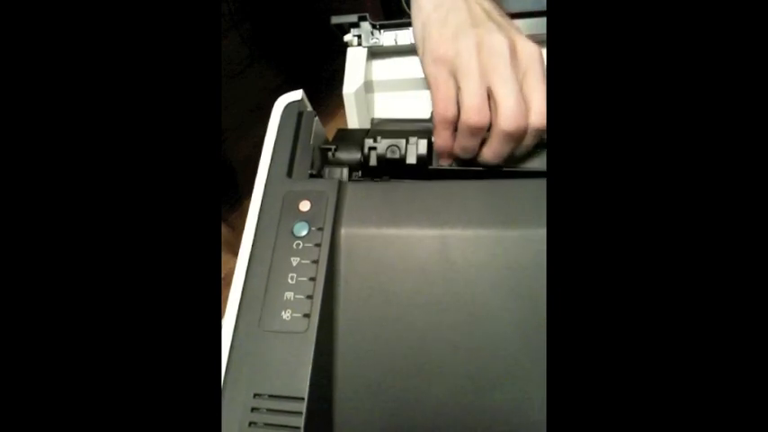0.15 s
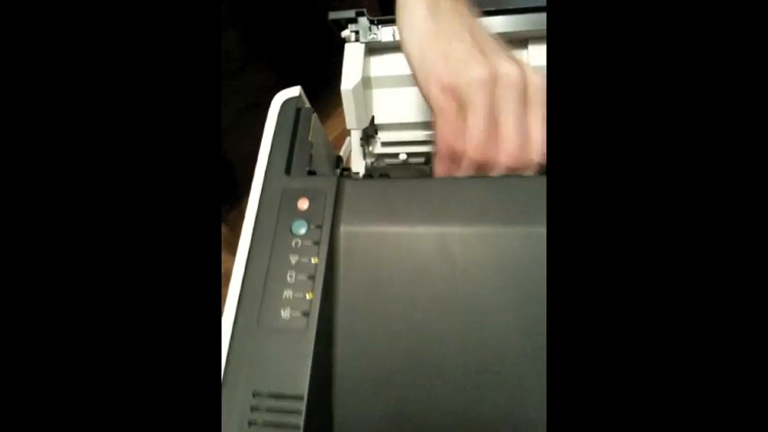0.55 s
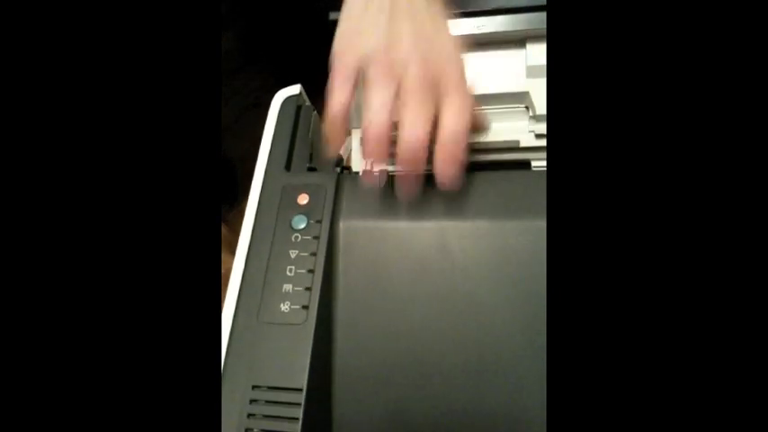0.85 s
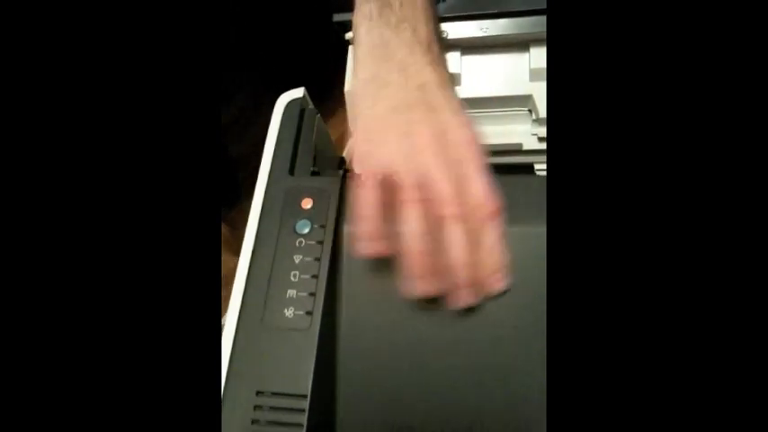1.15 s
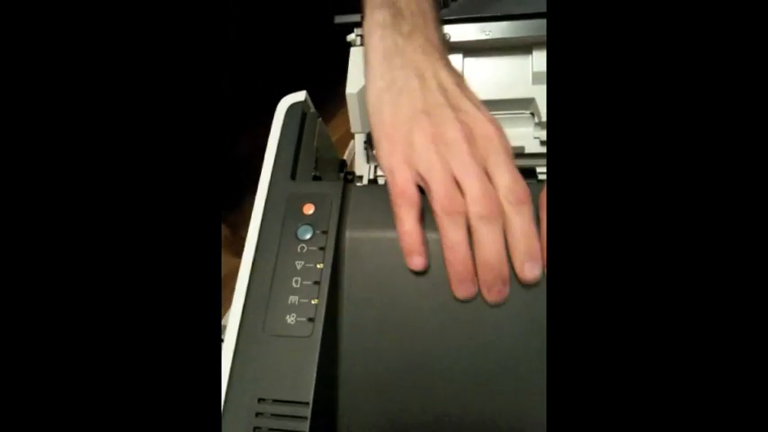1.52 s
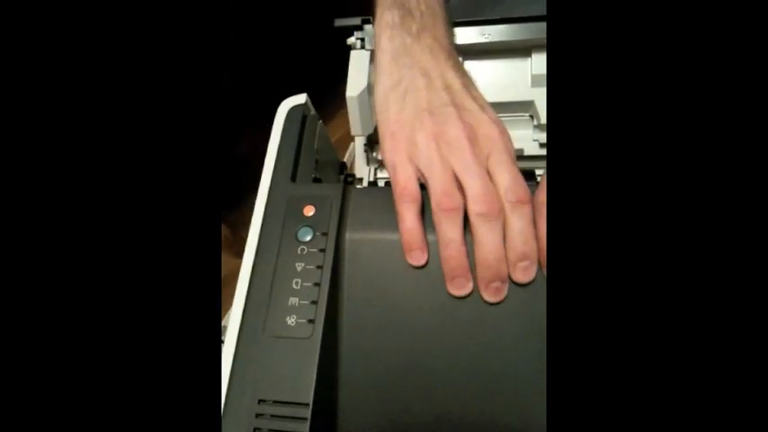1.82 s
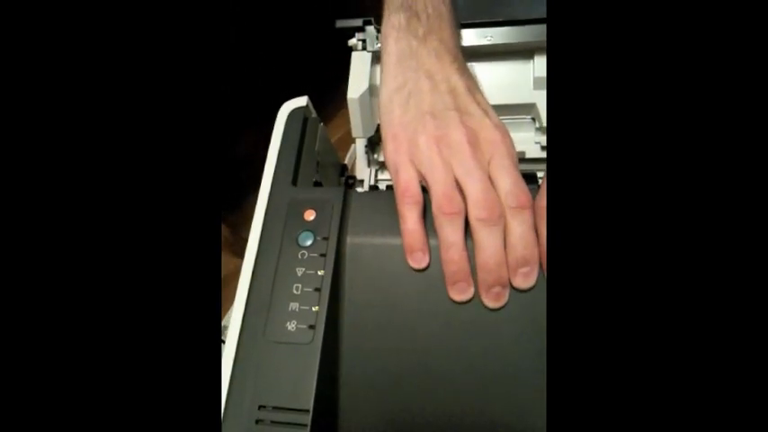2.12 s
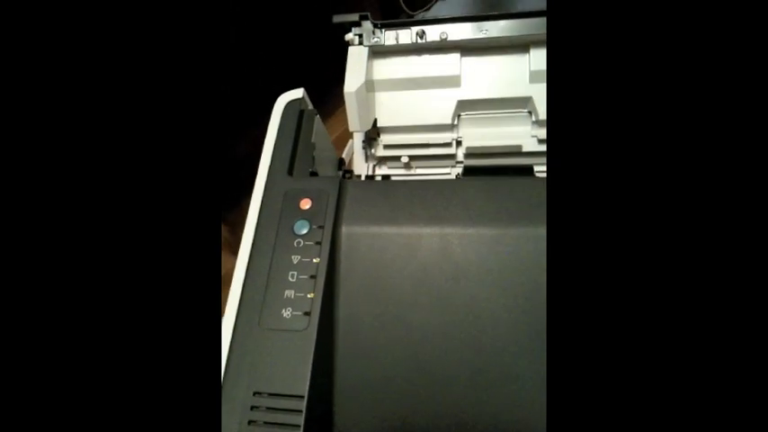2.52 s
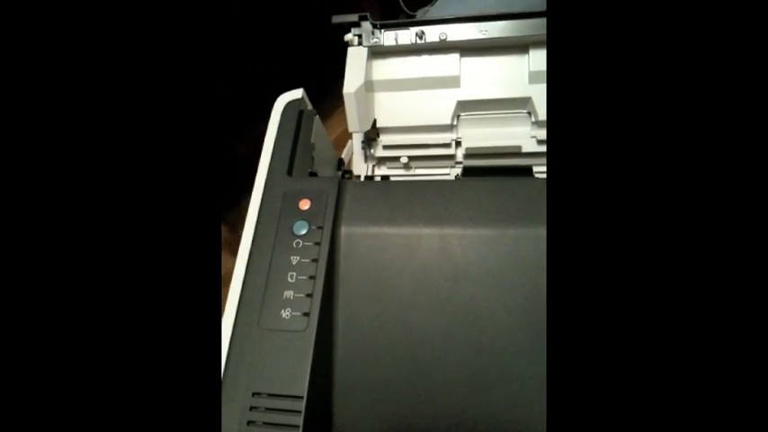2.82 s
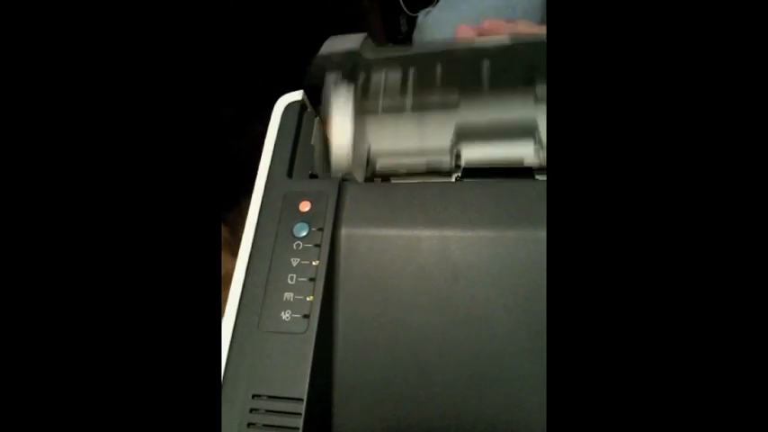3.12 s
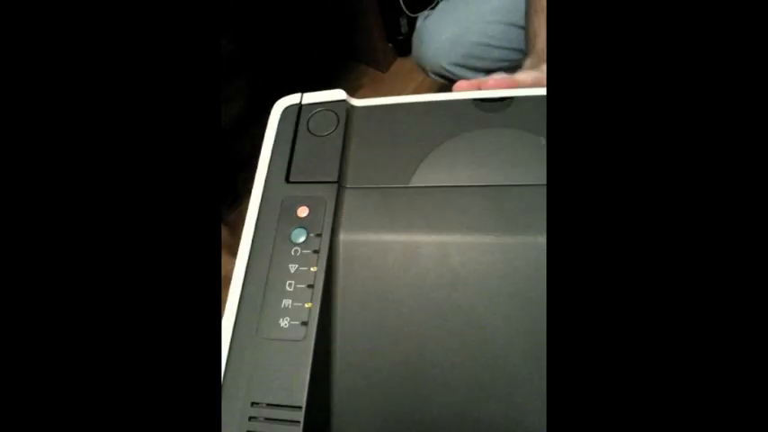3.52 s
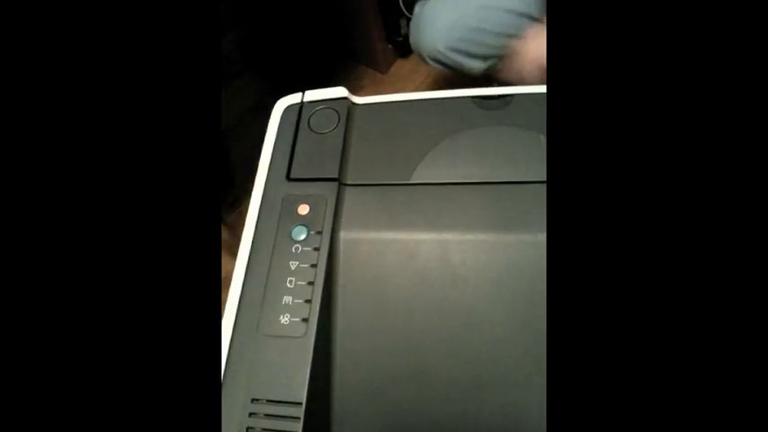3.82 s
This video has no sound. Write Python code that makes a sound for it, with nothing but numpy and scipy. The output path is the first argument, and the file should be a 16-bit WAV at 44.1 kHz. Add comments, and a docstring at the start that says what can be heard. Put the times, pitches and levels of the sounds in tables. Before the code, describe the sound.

Plastic printer cartridge clicks and knocks into its seat, then the cover slams with a sharp clack

```python
"""In a small room, close to a phone, a laser printer's fan hums and whines: shaped noise under wavering sines.
A toner cartridge is slid and pushed in: bursts of uneven clicks ring its plastic modes, and hollow ones until seated.
Low decaying thuds mark its seating and a hand shifting on the lid, then the cover is swung shut with a sharp clack:
clicks, scrapes and a boom on the cover's own modes, and last a hand brushing it.
All but the fan is spread by the room's reflections."""
import sys
import numpy as np
from scipy import signal
from scipy.fft import rfft, irfft
from scipy.io import wavfile
from scipy.ndimage import uniform_filter1d, minimum_filter1d

SR = 44100
rng = np.random.default_rng(int(sys.argv[2]) if len(sys.argv) > 2 else 0)


def inscribe(sig):
    """Save sig as 16-bit PCM at rate SR to the path in sys.argv[1].

    A 1-D sig is mono; a 2-D sig holds one channel per row.
    Samples are clipped to [-1, 1] before scaling.
    """
    pcm = np.round(np.clip(np.atleast_2d(sig).T, -1, 1) * 32767)
    wavfile.write(sys.argv[1], SR, pcm.astype(np.int16))


N = 174195  # length in samples
BASS_HZ, TREBLE_HZ = 500, 4000  # band limits of the plastic parts


def amp(db):
    """Level law: amplitude ratio of a level in dB."""
    return 10 ** (np.asarray(db) / 20)


def unit(x):
    """Normalisation to an rms of 1."""
    return x / np.sqrt(np.mean(x ** 2))


def unit_energy(x):
    """Normalisation to an energy of 1."""
    return x / np.sqrt(np.sum(x ** 2))


def decay(age, t60):
    """Exponential damping: 60 dB down after t60 seconds."""
    return 1000. ** (-age / t60)


def ringing(modes, age):
    """Modal superposition: a sum of damped sines (f/Hz, level/dB, T60/s)."""
    return sum(amp(db) * np.sin(2 * np.pi * f * age) * decay(age, t60) for f, db, t60 in modes)


def butter(x, order, hz, kind):
    """Butterworth filtering: a maximally flat pass band."""
    return signal.sosfilt(signal.butter(order, hz, kind, fs=SR, output="sos"), x)


def on_log(points, hz):
    """Interpolation of a (f/Hz, value) table on a logarithmic frequency axis."""
    f, value = np.array(points).T
    return np.interp(np.log(np.maximum(hz, 1)), np.log(f), value)


def walk(rate):
    """Slow random modulation: random levels joined by ramps of 1 / rate seconds, rms 1."""
    k = int(SR / rate)
    steps = np.repeat(rng.standard_normal(N // k + 1), k)
    return unit(uniform_filter1d(steps, k)[:N])


# spectrum of the air rush: f/Hz, relative level per Hz/dB
AIR = [(12, -68), (20, -31), (60, -73), (98, -23.5), (210, -7), (337, -8.5), (410, -1.5), (513, -8),
       (2300, -13), (4180, -20), (13900, -31), (16000, -42)]
# fan resonances: f/Hz, full width at half amplitude/Hz, mean level/dB
HUM = [(127.4, 8.3, -77), (212, 39, -66.5), (425, 10, -79), (736, 15, -74.5)]
AIR_DB, WHINE_HZ, WHINE_DB, OVERTONE_DB = -62, 4129, -78.5, -86


def fan():
    """Broadband flow noise, narrow-band resonance and a tone with its octave, all wavering slightly."""
    hz = np.fft.rfftfreq(N, 1 / SR)
    rush = irfft(rfft(rng.standard_normal(N)) * amp(on_log(AIR, hz)), N)
    out = amp(AIR_DB + .8 * walk(2.2)) * unit(rush)
    for f, width, db in HUM:
        resonance = 1 / (1 + (2 * (hz - f) / width) ** 2)
        hum = irfft(rfft(rng.standard_normal(N)) * resonance, N)
        out = out + amp(db + 1.5 * walk(2.2)) * unit(hum)
    wavering_time = np.cumsum(1 + .0006 * walk(5)) / SR
    for f, db in ((WHINE_HZ, WHINE_DB), (2 * WHINE_HZ, OVERTONE_DB)):
        tone = np.sqrt(2) * np.sin(2 * np.pi * f * wavering_time)
        out = out + amp(db + 1.2 * walk(16)) * tone
    return out


# reverberation time of the room: f/Hz, T60/s
ROOM_T60 = [(100, 0.1), (300, .29), (2000, 0.28), (5000, 0.3), (14000, 0.15)]
ROOM_DB, ROOM_GAP_S = -8.5, 0.0017  # reverberant level, build-up time of the reflections


def room(x):
    """Diffuse reverberation: dense reflections, each octave band dying at its own rate."""
    t, tail = np.arange(SR) / SR, 0
    for hz in 62.5 * 2 ** np.arange(9):
        octave = [hz / np.sqrt(2), min(hz * np.sqrt(2), 20000)]
        noise = butter(rng.standard_normal(SR), 2, octave, "band")
        tail = tail + noise * decay(t, on_log(ROOM_T60, hz))
    tail = tail * (1 - np.exp(-(t / ROOM_GAP_S) ** 2))
    return x + amp(ROOM_DB) * signal.fftconvolve(x, unit_energy(tail))[:N]


# low thuds, the hand on the lid and at 1.466 s the cartridge thumping into its seat:
# t/s, level ahead of rise and decay/dB, f/Hz
THUDS = [(1.287, -51, 155), (1.891, -44.5, 194), (1.923, -47, 165), (2.171, -51, 185), (2.356, -47, 168),
         (2.45, -45.5, 175), (1.466, -33, 200)]
THUD_T60_S, THUD_RISE_S = 0.079, 0.0033


def thuds():
    """Damped oscillation: soft low thuds of the hand on the lid and of the cartridge seating."""
    t, out = np.arange(N) / SR, 0
    for s, db, hz in THUDS:
        age = np.maximum(t - s, 0)
        envelope = (1 - np.exp(-age / THUD_RISE_S)) * decay(age, THUD_T60_S)
        out = out + amp(db) * envelope * np.sin(2 * np.pi * hz * age)
    return out


def causal(db):
    """Minimum-phase principle: folding the cepstrum of dB gains on an rfft grid gives a causal response."""
    cepstrum = irfft(db * np.log(10) / 20)
    half = len(cepstrum) // 2
    cepstrum[1:half] *= 2
    cepstrum[half + 1:] = 0
    return irfft(np.exp(rfft(cepstrum)))


def body(colour, modes, ring_db):
    """Modal response: a broad crack plus modes, split into middle, bass and treble of energy 1 each."""
    t, hz = np.arange(8192) / SR, np.fft.rfftfreq(8192, 1 / SR)
    crack = unit(causal(on_log(colour, hz)))
    response = crack + amp(ring_db) * unit(ringing(modes, t))
    low = butter(response, 2, BASS_HZ, "low")
    high = butter(response, 2, TREBLE_HZ, "high")
    mid = butter(response, 2, [BASS_HZ, TREBLE_HZ], "band")
    return [unit_energy(band) for band in (mid, low, high)]


KNOCK_DB = -1.2  # added to every knock level
ATTACK_S = 0.002
SOFT_S_PER_DB, HARD_DB = .00015, -28  # knocks under HARD_DB start slower
SLIDE_DB, SLIP_DB = -4, 2.5  # added to every slide level, rms of its random variation


def shape(length, db):
    """Contact stiffness: a knock's chatter swells more slowly when weak, then decays exponentially."""
    age = np.arange(4096) / SR
    attack = ATTACK_S + SOFT_S_PER_DB * max(HARD_DB - db, 0)
    return (1 - np.exp(-age / attack)) * np.exp(-age / max(length, .001) * 2)


def contact(knocks, slides):
    """Addition of powers in three bands: knocks chatter and die, slides stick and slip."""
    power = np.zeros((3, N + 4096))
    for s, db, bass_db, treble_db, length, _ in knocks:
        i = max(int(s * SR), 0)
        band_gains = amp([0, bass_db, treble_db]) * amp(db + KNOCK_DB)
        power[:, i:i + 4096] += np.outer(band_gains, shape(length, db)) ** 2
    slip = amp(SLIDE_DB + SLIP_DB * walk(120))
    for rows in slides:
        s, db, bass_db, treble_db = np.array(rows).T
        i = np.arange(max(int(s[0] * SR), 0), min(int(s[-1] * SR), N))
        edge = np.minimum(np.minimum(i - i[0], i[-1] - i) / (.001 * SR), 1)  # 1 ms fades
        for band, offset_db in enumerate((0, bass_db, treble_db)):
            level = amp(np.interp(i / SR, s, db + offset_db))
            power[band, i] += (level * slip[i] * edge) ** 2
    return np.sqrt(power[:, :N])


SPOT_DB, SPOT_CYCLES = -7, 20  # level added to the wall's ring, cycles to -60 dB


def spots(knocks, grains):
    """Local resonance: each knock also rings the nearest wall at its own pitch."""
    out, t = np.zeros(N + 8192), np.arange(2048) / SR
    for s, db, _, _, length, hz in knocks:
        i = max(int(s * SR), 0)
        ring = np.sin(2 * np.pi * hz * t) * decay(t, SPOT_CYCLES / hz)
        push = shape(length, db) * grains[i:i + 4096]
        y = signal.fftconvolve(push, unit_energy(ring))
        out[i:i + len(y)] += amp(db + KNOCK_DB + SPOT_DB) * y
    return out[:N]


GRAIN_DB, BIGGEST_GRAIN_DB = 2.5, 9  # mean of the exponential size spread before its cap, the cap


def part(knocks, slides, colour, modes, ring_db):
    """Source-filter principle: dense clicks of uneven size, driven by the contact, ring the part."""
    size = amp(np.minimum(GRAIN_DB * rng.exponential(size=N), BIGGEST_GRAIN_DB))

    def grains():
        """Random excitation: clicks of uneven size, rms 1."""
        return unit(size * rng.standard_normal(N))

    out = spots(knocks, grains())
    for strength, response in zip(contact(knocks, slides), body(colour, modes, ring_db)):
        out = out + signal.fftconvolve(strength * grains(), response)[:N]
    return out


# modes of the cover: f/Hz, relative level/dB, T60/s
COVER = [(201, -3, .1), (240, 6, 0.1), (332, 9, 0.028), (775, -1, .035), (2000, -5, .01), (3550, -1, .012),
         (6300, 0, .004), (12550, -22.5, .08)]
# the cover's weight landing on front and rear rim: t/s, level ahead of the push and the high-pass/dB
SLAMS = [(3.2968, -4.5), (3.3225, -13)]
SLAM_PUSH_S = .0015


def slam():
    """Impulsive excitation: a short push sets the cover's low modes booming."""
    t, out = np.arange(N) / SR, 0
    low_modes = [mode for mode in COVER if mode[0] < BASS_HZ]
    for s, db in SLAMS:
        age = np.maximum(t - s, 0)
        ring = ringing(low_modes, age)
        out = out + amp(db) * (1 - np.exp(-age / SLAM_PUSH_S)) * ring / np.max(np.abs(ring))
    return out


# knocks of the cover, from 3.69 s under a brushing hand: t/s, level before KNOCK_DB/dB,
# bass re middle/dB, treble re middle/dB, chatter length (decay to 1/e^2)/s, struck wall f/Hz
CLACKS = [(2.954, -50.5, -15, -1, 0.01, 1690), (2.995, -36.5, -23, -11, 0.009, 1820),
          (3.067, -41, -21, -4, 0.011, 956), (3.176, -50, -12, -6, 0.015, 756),
          (3.265, -27, -14, -2.5, 0.008, 1766), (3.29, -9, -22, 3, 0.014, 1690),
          (3.297, -5, -8, -4, 0.012, 400), (3.302, 0, -18, 1, 0.011, 2050),
          (3.312, -10, -15, 1, 0.014, 1100), (3.324, -11, -12, -8, 0.0078, 762),
          (3.703, -42.5, -18, -12, 0.011, 1705), (3.719, -27.5, -15.5, -13, 0.01, 974),
          (3.734, -35.5, -20, -4, 0.0066, 1910)]
# cover rubbing on hinge and rim, from 3.69 s a hand brushing the cover, one list per stroke:
# t/s, level before SLIDE_DB/dB, bass re middle/dB, treble re middle/dB
RUBS = [
    [(2.99, -48, -15, -10), (3.062, -65, -8, -24), (3.072, -53, -19, 1.5), (3.13, -65, -8, -11)],
    [(3.25, -50.5, -3, -12), (3.266, -41.5, -15, 0), (3.283, -36, -1, -1)],
    [(3.288, -12, -10, 0), (3.293, -21, -13, 1)],
    [(3.5, -53, -12.5, -9.5), (3.596, -60.5, -9, 2), (3.604, -59, 0.5, -4.5), (3.66, -62, 7, -4.5)],
    [(3.695, -58.5, -6.5, -3), (3.713, -38, -5, -4), (3.737, -44, -4, 4), (3.8, -65.5, -22.5, -25)],
    [(3.81, -58, -19.5, -11), (3.886, -69.5, -2, -18), (3.924, -67, -13.5, -17.5), (3.95, -64.5, -7, -11.5)],
]
# crack spectrum of the cover: f/Hz, relative level per Hz/dB
COVER_COLOUR = [(30, -49.5), (120, -25.5), (230, -3.5), (600, -4.5), (1900, -0.5), (4500, -8.5),
                (6500, -7.5), (8500, -13), (12000, -16.5), (16000, -24)]
COVER_RING_DB, COVER_LOW_HZ = -8, 170  # modes re crack, high-pass corner


def cover():
    """Radiation cut-off: the thin cover radiates little below its lowest mode."""
    struck = part(CLACKS, RUBS, COVER_COLOUR, COVER, COVER_RING_DB) + slam()
    return butter(struck, 4, COVER_LOW_HZ, "high")


# knocks of the cartridge and housing: t/s, level before KNOCK_DB/dB, bass re middle/dB, treble re middle/dB,
# chatter length (decay to 1/e^2)/s, struck wall f/Hz
KNOCKS = [(0.001, -37.5, -7, -6, 0.024, 1330), (0.061, -36, -14, -12.5, 0.01, 1990),
          (0.309, -49, -18, -3, 0.018, 1540), (0.432, -49, -22, -20, 0.0072, 1160),
          (0.443, -36, -23, -19, 0.0073, 1290), (0.454, -34.5, -32, -0.5, 0.012, 1310),
          (0.4615, -19, -38, -9, 0.008, 1160), (0.472, -23, -23, -8, 0.0086, 1340),
          (0.496, -18.5, -30, 1, 0.008, 2400), (0.502, -19, -40, -5, 0.007, 1200),
          (0.512, -30, -26, -10, 0.0055, 1070), (0.539, -32, -19, 1, 0.0067, 1350),
          (0.548, -31, -27, -3, 0.012, 1120), (0.571, -30.5, -36, -3, 0.011, 1360),
          (0.58, -35.5, -22, 3.5, 0.024, 1820), (0.599, -32, -8, -9, 0.0095, 2260),
          (0.673, -32, -6, 1, 0.0039, 1270), (0.712, -26.5, -12, -16, 0.0076, 620),
          (0.722, -25.5, -18, 5, 0.0078, 1450), (0.745, -27, -23, -9, 0.008, 2240),
          (0.775, -31.5, -26, 3.5, 0.0057, 1740), (0.803, -30.5, -18, -1, 0.0076, 1410),
          (0.844, -39, -15, -7, 0.0073, 1320), (0.876, -31.5, -26, -22, 0.0074, 2540),
          (0.888, -28.5, -14, -1.5, 0.0072, 2560), (0.909, -24, -40, -8.5, 0.015, 850),
          (0.929, -33, -23, -4, 0.0068, 2380), (1.095, -34, -31, -9.5, 0.013, 1440),
          (1.268, -52, -18, -9, 0.012, 937), (1.4145, -37, -14, 0, 0.012, 1440),
          (1.446, -25, -27, -8, 0.013, 2190), (1.458, -16, -34, -1, 0.011, 1470),
          (1.462, -12, -43, 0, 0.012, 560), (1.484, -24, -19, -10, 0.012, 1660),
          (1.508, -26, -20, -8, 0.03, 1350), (1.631, -41, -27, -4.5, 0.014, 1780),
          (1.76, -45.5, -16, -9.5, 0.0098, 730), (1.933, -38.5, -25, -16, 0.015, 1270),
          (2.122, -39, -23, -12, 0.025, 1100), (2.191, -42.5, -17, -6, 0.02, 1370),
          (2.352, -51.5, -12, 2, 0.008, 503)]
# cartridge sliding in its guides, one list per stroke:
# t/s, level before SLIDE_DB/dB, bass re middle/dB, treble re middle/dB
SLIDES = [
    [(0.41, -64.5, -12, 5), (0.45, -45.5, -20, -16), (0.46, -40, -27, -4)],
    [(0.51, -34, -29, -9), (0.52, -46, 4.5, 4), (0.7, -52, -6.5, -6)],
    [(0.709, -41, 4, -5), (0.731, -38, -8, -4), (0.87, -56.5, -9, 0)],
    [(0.872, -47, -3, 2), (0.916, -43, -20, -11), (0.99, -57.5, -9, -10)],
    [(1.2, -65, -6, -2), (1.348, -65.5, -10, 9), (1.4, -61, -15, -1)],
    [(1.425, -52, -11, 5), (1.442, -32, -15, -6.5), (1.458, -25, -28, 0)],
    [(1.47, -26, -22, -5.5), (1.6, -55.5, -11, -0.5), (1.62, -64, -25, -12)],
    [(1.86, -76, -5, -5), (1.934, -53, 1.5, -15), (1.99, -76, 9, -23)],
    [(2.105, -61, -5, -3), (2.133, -49, -20, -14), (2.26, -79, 5, -23)],
    [(2.55, -70, -9, 4), (2.604, -57, -32, -8), (2.63, -71, 4, -18)],
]
# hollow modes of the loose cartridge: f/Hz, relative level/dB, T60/s
HOLLOW = [(1267, 1.5, 0.03), (2400, -5, 0.045)]
HOLLOW_DB, LOOSE_S, SEATED_S, SEATING_S = -.5, .4, 0.514, 0.053  # the last is a time constant


def hollow():
    """Clamping damps resonance: the loose shell rings with each contact until the guides grip it."""
    t = np.arange(N) / SR
    ring = ringing(HOLLOW, t[:4096])
    loose = (t > LOOSE_S) * np.exp(-np.maximum(t - SEATED_S, 0) / SEATING_S)
    middle = contact(KNOCKS, SLIDES)[0]
    push = middle * loose * rng.standard_normal(N)
    return amp(HOLLOW_DB) * signal.fftconvolve(push, unit_energy(ring))[:N]


# modes of the cartridge: f/Hz, relative level/dB, T60/s
CARTRIDGE = [(324, -18, 0.035), (560, -4, 0.05), (1284, -8, 0.012), (2370, 18.5, 0.013), (3630, 10, 0.0072),
             (6400, -26, .015)]
# crack spectrum of the cartridge: f/Hz, relative level per Hz/dB
CARTRIDGE_COLOUR = [(30, -44), (100, -11), (330, -6), (600, 2), (1300, 4.5), (3000, -1.5), (6000, -3.5),
                    (10000, -10), (16000, -18)]
CARTRIDGE_RING_DB = -15.5  # modes re crack


def cartridge():
    """Impact and friction excitation: knocks and slides ring the cartridge and its hollow shell."""
    return part(KNOCKS, SLIDES, CARTRIDGE_COLOUR, CARTRIDGE, CARTRIDGE_RING_DB) + hollow()


def scene():
    """Superposition: everything handled, in the room, over the fan."""
    handled = cartridge() + cover() + thuds()
    return (room(handled) + fan())[None]


MIC_HZ, TOP_HZ = 90, 16250  # lower and upper band limits
CEILING, LIMIT_S = .76, .002  # limiter threshold (amplitude), window


def record(dry):
    """Band and peak limiting: the phone loses deep bass, limits the loudest peaks and cuts the top."""
    x = butter(dry, 2, MIC_HZ, "high")
    k = int(LIMIT_S * SR)
    needed_gain = CEILING / np.maximum(np.abs(x), CEILING)
    gain = uniform_filter1d(minimum_filter1d(needed_gain, size=k), size=k)
    return signal.sosfilt(signal.ellip(10, .2, 70, TOP_HZ, fs=SR, output="sos"), x * gain)


dry = scene()
out = record(dry)
inscribe(out)
```